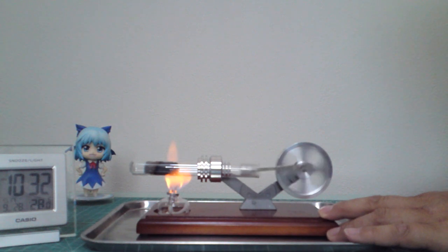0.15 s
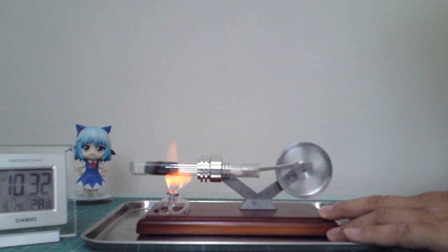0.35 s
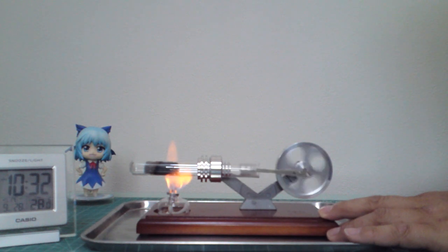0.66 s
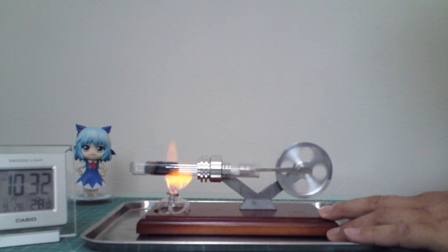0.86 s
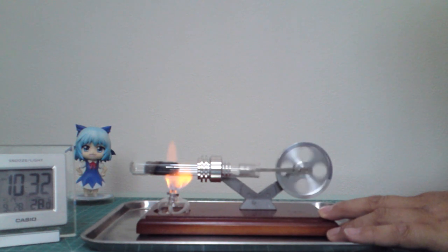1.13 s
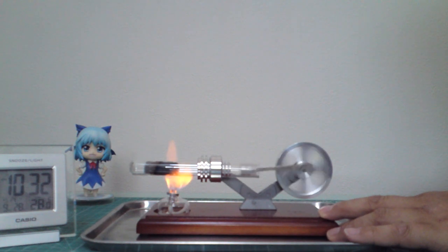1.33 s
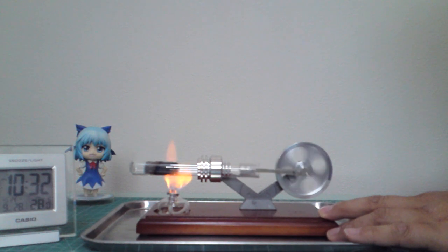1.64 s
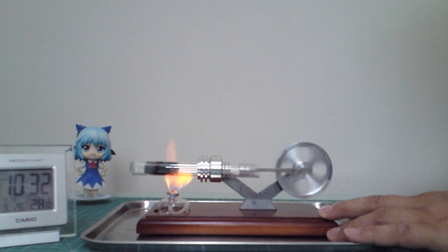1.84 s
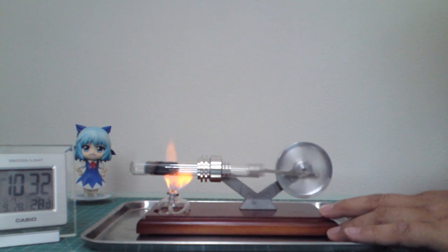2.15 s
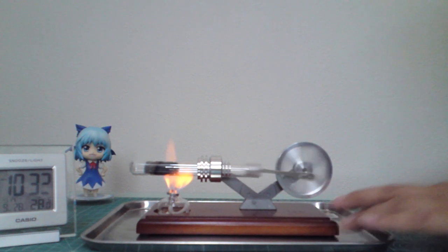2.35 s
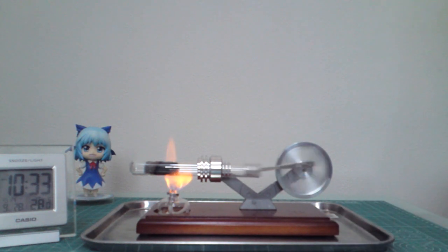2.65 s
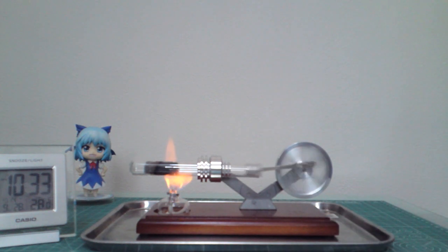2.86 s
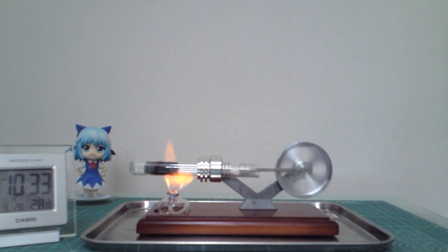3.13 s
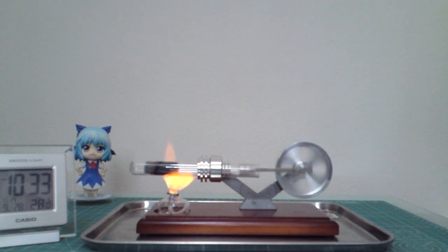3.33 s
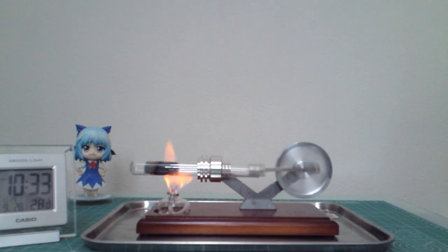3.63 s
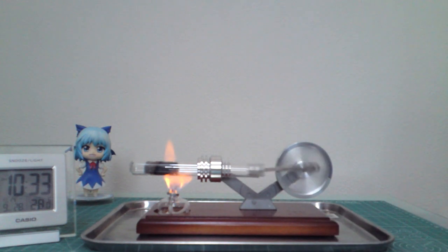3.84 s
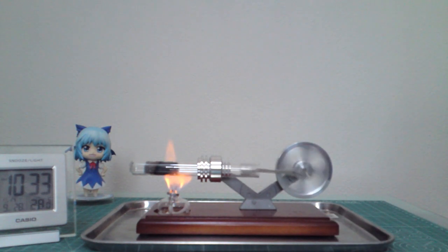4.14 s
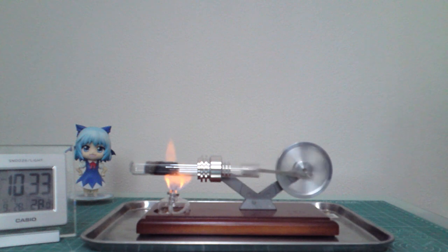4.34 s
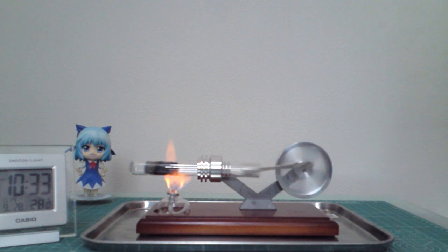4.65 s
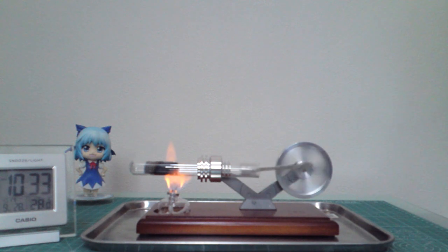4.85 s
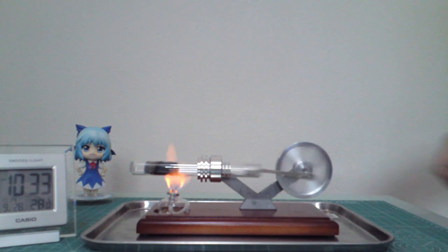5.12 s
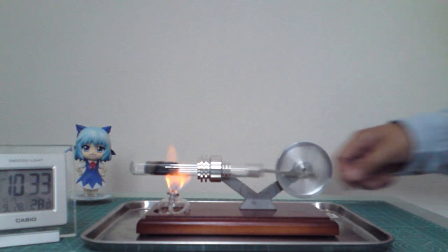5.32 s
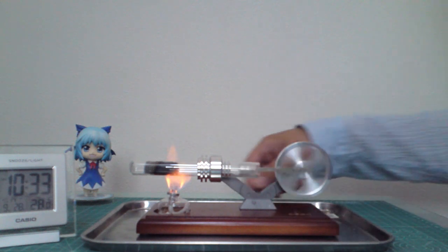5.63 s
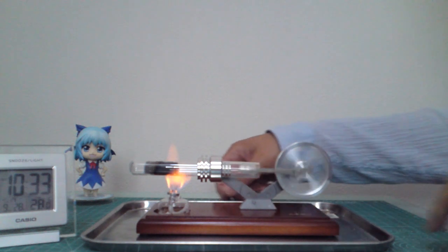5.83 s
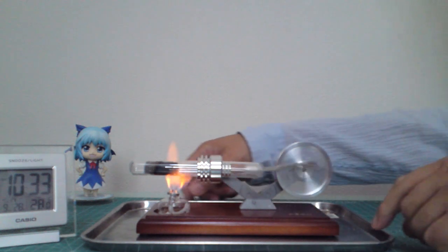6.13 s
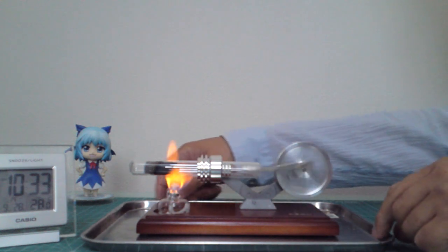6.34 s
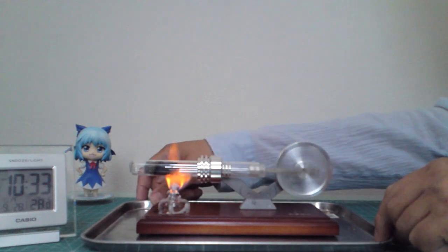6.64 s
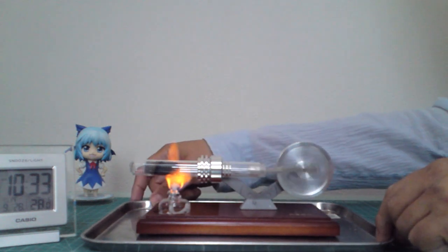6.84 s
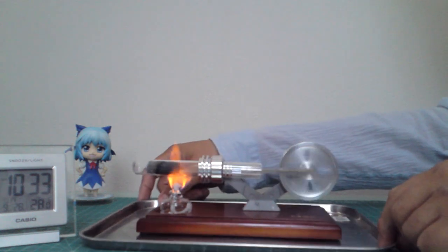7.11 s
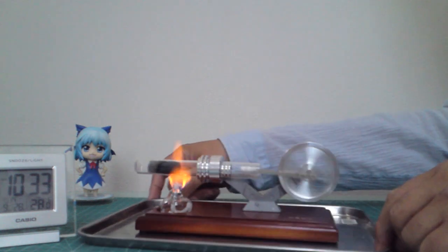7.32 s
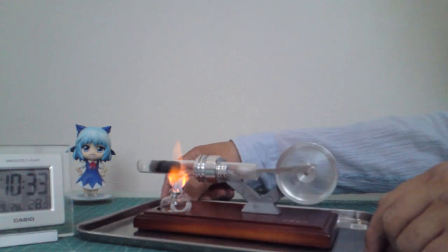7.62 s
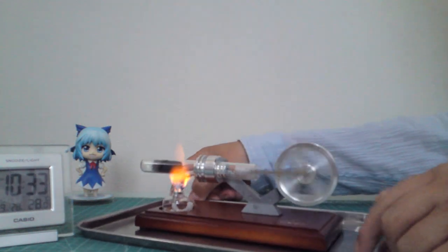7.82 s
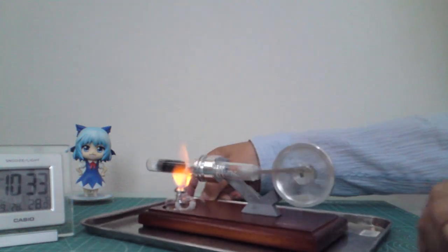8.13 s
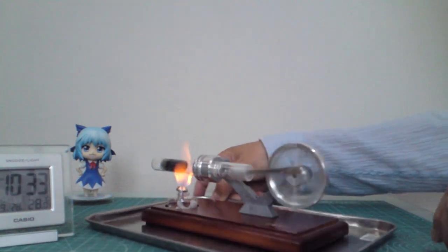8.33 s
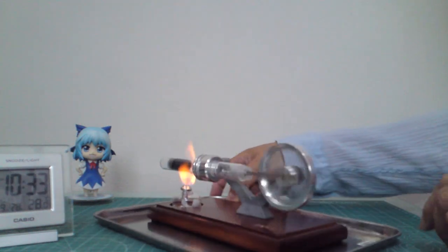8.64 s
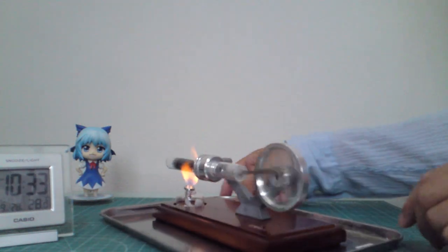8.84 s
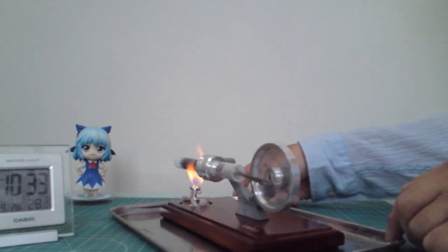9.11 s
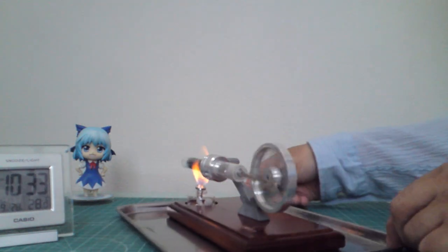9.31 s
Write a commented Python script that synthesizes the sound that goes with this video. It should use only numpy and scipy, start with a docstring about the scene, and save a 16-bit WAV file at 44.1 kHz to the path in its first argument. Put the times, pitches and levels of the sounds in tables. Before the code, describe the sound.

In a small bare room, a tabletop flame-heated engine knocks with dry metallic ticks, two per turn, a lighter then a heavier one. The ticks speed up quickly, then settle into a fast, gradually tightening clatter. Soft low thuds come from the wooden base on the desk, and short hollow pops crowd in past the middle as hands move close. A close microphone catches faint hiss and a thin whine.

```python
"""A small hot-air engine runs up on a wooden base in a steel tray, in a small bare room. Its loose crank joints
knock twice a turn: each knock is a tick of short, scraped resonances, a flutter of narrow-band repeats between
two walls, and a ring-out of rattled frame modes and room noise. The base thuds on the desk as low resonances,
and short low pops come as hands move near. One dull snap passes as a brief pressure dip; a faint wavering sine
whines over a low bed of coloured hiss."""
import sys
import numpy as np
from scipy import signal
from scipy.fft import rfft, irfft, next_fast_len
from scipy.io import wavfile

SR = 44100
rng = np.random.default_rng(int(sys.argv[2]) if len(sys.argv) > 2 else 0)


def file_out(sig):
    """Save sig as 16-bit WAV at sys.argv[1]."""
    # one column per channel
    cols = np.atleast_2d(sig).T
    # limit, then scale
    lim = np.clip(cols, -1, 1)
    pcm = np.round(lim * 32767).astype(np.int16)
    wavfile.write(sys.argv[1], SR, pcm)


N = 417627

# Crank knocks, two a turn, a light one and then a heavy one.
# Each row: time in seconds, tick level in dB, flutter level in dB (both before each mode's own level).
KNOCK_ROWS = [(0.057, -31.5, -41), (0.093, -28, -23.5), (0.402, -20, -22), (0.4379, -26, -19),
              (0.723, -27, -46), (0.764, -28, -21), (0.9885, -26.5, -35), (1.033, -27, -22),
              (1.237, -27, -34), (1.2812, -23.5, -34), (1.474, -19.5, -26.5), (1.5181, -25, -24),
              (1.703, -22.5, -27), (1.749, -21.5, -17.5), (1.9292, -20, -20.5), (1.9757, -23, -23),
              (2.1498, -20.5, -27), (2.1984, -25.5, -16.5), (2.369, -21, -25), (2.4165, -27, -14),
              (2.5816, -23, -27), (2.6301, -23, -12), (2.7912, -19.5, -25), (2.8401, -21.5, -10.5),
              (2.997, -22.5, -24), (3.046, -20.5, -14), (3.2005, -21.5, -19), (3.2478, -22, -15),
              (3.4007, -20.5, -26), (3.4498, -23, -16), (3.598, -20.5, -41), (3.6486, -19.5, -27),
              (3.7938, -20.5, -20), (3.8431, -18, -19), (3.9889, -19, -31), (4.0379, -18.5, -14.5),
              (4.1826, -22, -25), (4.2317, -22.5, -21.5), (4.375, -20.5, -22), (4.4233, -20, -16.5),
              (4.567, -21.5, -21.5), (4.616, -22, -22), (4.757, -19, -28), (4.808, -21.5, -18),
              (4.947, -21.5, -23), (4.9985, -20, -13), (5.1374, -20, -26), (5.1875, -23, -19.5),
              (5.3232, -22.5, -30), (5.377, -18, -19.5), (5.512, -18, -21.5), (5.5648, -18, -11.5),
              (5.699, -22.5, -22), (5.752, -18, -13), (5.8851, -21.5, -25), (5.9382, -21.5, -16.5),
              (6.0706, -21, -26), (6.1233, -15, -19.5), (6.256, -25, -20.5), (6.3093, -13.5, -19),
              (6.44, -24.5, -23.5), (6.4925, -19, -14.5), (6.624, -20.5, -18), (6.678, -19.5, -17),
              (6.8046, -24, -31), (6.8608, -13.5, -17.5), (6.988, -22.5, -17.5), (7.043, -21.5, -16.5),
              (7.171, -15.5, -18), (7.2258, -22, -14.5), (7.3509, -22, -20.5), (7.4068, -13, -24),
              (7.5331, -20.5, -19), (7.5878, -11.5, -11.5), (7.7135, -15, -25), (7.7685, -14, -16.5),
              (7.8915, -18, -20.5), (7.9458, -13, -17), (8.0697, -16, -22), (8.123, -11, -17),
              (8.2476, -15.5, -28), (8.3001, -20, -36), (8.4248, -21, -20.5), (8.4797, -13, -13),
              (8.601, -18, -22.5), (8.6566, -13, -14.5), (8.7767, -19.5, -33), (8.8327, -11, -14.5),
              (8.9526, -18, -31), (9.009, -15.5, -20), (9.128, -18, -32), (9.1857, -15.5, -24.5),
              (9.304, -18, -22), (9.359, -11.5, -17)]


def amp(db):
    """Turn decibels into gain."""
    return 10 ** (np.asarray(db) / 20)


def in_time(rows):
    """Draw each column of a timed table as a curve with one value per sample."""
    s, *columns = np.transpose(rows)
    return [np.interp(np.arange(N) / SR, s, c) for c in columns]


def colour(x, points):
    """Shape a steady signal by a spectrum of (Hz, dB) points."""
    size = next_fast_len(N)
    hz = np.maximum(np.fft.rfftfreq(size, 1 / SR), 1)
    point_hz, point_db = np.transpose(points)
    gain = amp(np.interp(np.log(hz), np.log(point_hz), point_db))
    return irfft(rfft(x, size) * gain, size)[:N]


def clicks(s, db):
    """Put a one-sample click at each event, over a floor too small to hear."""
    out = np.full(N, 1e-18)
    places = np.clip((np.asarray(s) * SR).astype(int), 0, N - 1)
    np.add.at(out, places, amp(db))
    return out


def ring(x, hz, width_hz):
    """A resonance: a unit click starts a dying sine of height 1, shorter when the width is larger."""
    r, w = np.exp(-np.pi * width_hz / SR), 2 * np.pi * hz / SR
    return signal.lfilter([0, np.sin(w)], [1, -2 * r * np.cos(w), r * r], x)


def ring_softly(x, hz, width_hz):
    """A resonance met twice: it swells to height 1 after a unit click and has steep flanks."""
    twice = ring(ring(x, hz, width_hz), hz, width_hz)
    return twice * 2 * np.e * np.pi * width_hz / SR


def fade(x, t60):
    """Each click jumps to its height and dies away, by 60 dB in t60 seconds."""
    return signal.lfilter([1], [1, -amp(-60 / (t60 * SR))], x)


def swell(x, rise_s):
    """Smooth a signal, which rounds the start of an envelope."""
    r = np.exp(-1 / (rise_s * SR))
    return signal.lfilter([1 - r], [1, -r], x)


def later(x, lag_s):
    """Delay a signal."""
    return np.concatenate([np.zeros(round(lag_s * SR)), x])[:N]


def rattle(per_s, spread_db):
    """Uneven micro-clicks at random moments, scaled to an rms of 1."""
    sizes = amp(spread_db * np.minimum(rng.exponential(1, N), 4)) * rng.choice([-1, 1], N)
    grains = sizes * (rng.random(N) < per_s / SR)
    return grains / grains.std()


def strike(s, db, modes, spread_db, scrape_db, stagger_s):
    """The joint scrapes, then closes in a few small impacts; each mode is met a little apart."""
    out = np.zeros(N)
    chance = np.clip(rng.normal(0, 1, (len(s), len(modes), 4)), -2, 1.5)
    for k, (hz, width_hz, mode_db) in enumerate(modes):
        level = db[:, k] + mode_db + spread_db * chance[:, k, 0]     # db has a column per mode
        blow = clicks(s + stagger_s * chance[:, k, 1], level)
        before = clicks(s - .0015 + stagger_s * chance[:, k, 2], level - 5.5)
        after = clicks(s + 0.002 + stagger_s * chance[:, k, 3], level - 13.0)
        grit = fade(blow[::-1], 0.015)[::-1] + fade(blow, 0.0075)     # grows into the blow and dies after it
        scrape = amp(scrape_db) * grit * rng.standard_normal(N)
        out += ring_softly(blow + before - after + scrape, hz, width_hz)
    return out


def run_up():
    """As the engine gathers force, set the ring-out and tick-top level of every knock."""
    # Each row: time in seconds, ring-out level of the light and of the heavy knock in dB,
    # level of the top of the tick for the light and for the heavy knock in dB (all relative).
    force_rows = [(0, -44, -46.5, -46, -39), (1.5, -42.5, -41, -34, -37), (2.5, -41, -38, -33.5, -30.5),
                  (3.5, -40.5, -39, -34.5, -24.5), (4.3, -43.5, -38.5, -36.5, -30),
                  (5.5, -41, -37, -34, -22), (7.2, -40, -36, -36.5, -22.5), (8.4, -41.5, -34, -30, -21.5),
                  (9.47, -40, -33.5, -38, -23)]
    s, (at, *columns) = np.array(KNOCK_ROWS)[:, 0], np.transpose(force_rows)
    ring_light, ring_heavy, top_light, top_heavy = (np.interp(s, at, c) for c in columns)
    heavy = np.arange(len(s)) % 2 == 1
    return np.where(heavy, ring_heavy, ring_light), np.where(heavy, top_heavy, top_light)


def hiss():
    """Low rumble and hiss: random noise shaped by a spectrum, with a slowly changing level."""
    # Each row: frequency in Hz, relative level in dB per Hz.
    spectrum = [(20, 7.5), (35, -9), (70, -2.5), (140, -8.5), (300, -11.5), (500, -13), (900, -16),
                (1500, -21), (3000, -23), (6000, -27), (9000, -22)]
    # Each row: time in seconds, level in dB rms.
    loudness = [(0, -50.5), (3, -49.5), (6, -47.5), (9.47, -46.5)]
    noise = colour(rng.standard_normal(N), [(3.1, -33.5)] + spectrum)
    return amp(in_time(loudness)[0]) * noise / noise.std()


def whine():
    """A thin sine tone whose pitch and strength waver."""
    # Each row: time in seconds, middle pitch in Hz, middle level in dB rms.
    tone_rows = [(0, 1205, -64), (1.3, 1203, -64.5), (2.7, 1195, -69), (3.0, 1183, -66), (3.3, 1190, -65),
                 (3.7, 1178, -64), (4.2, 1198, -64), (4.3, 1165, -69), (4.9, 1178, -67), (5.1, 1157, -66),
                 (6.05, 1154, -64), (6.3, 1170, -74), (9.47, 1170, -82)]
    hz, db = in_time(tone_rows)
    waver = swell(swell(rng.standard_normal(N), 0.025), 0.025)
    waver = waver / waver.std()
    wavering_hz = hz + 3.98 * waver[::-1]     # reversed, so pitch and strength do not move together
    tone = np.sin(2 * np.pi * np.cumsum(wavering_hz) / SR)
    return np.sqrt(2) * amp(db + 2.4 * waver) * tone


def snap():
    """A lone dull snap: a sudden dip in pressure that recovers within a few milliseconds."""
    dip = fade(clicks([1.3351], -27), 0.0061)     # start in s, level in dB; t60 in s
    return -swell(dip, .0001)


def pops():
    """Each pop is a soft push on a hollow, well-damped body with a woody overtone; deeper pops ring longer."""
    # Each row: start in seconds, level in dB, pitch in Hz.
    pop_rows = [(2.564, -30, 337), (2.596, -37.5, 377), (4.721, -42, 350), (4.787, -32.5, 342),
                (5.094, -30, 280), (5.125, -36, 378), (5.299, -29, 320), (5.315, -39, 237),
                (5.42, -41, 294), (5.437, -37, 345), (5.667, -33.5, 345), (5.773, -32, 342),
                (5.804, -32.5, 345), (5.836, -29.5, 346), (5.915, -28.5, 342), (5.926, -36, 310),
                (5.958, -30.5, 350), (6.015, -29, 350), (6.027, -35, 326), (6.056, -33.5, 342),
                (6.073, -33.5, 382), (6.1, -35, 340), (6.126, -29.5, 358), (6.196, -29.5, 342),
                (6.239, -31.5, 360), (6.285, -31.5, 360), (6.314, -30.5, 337), (6.3995, -29.5, 367),
                (6.429, -29.5, 366), (6.456, -31.5, 357), (6.523, -29, 350), (6.559, -34.5, 350),
                (6.603, -29, 366), (6.628, -33.5, 324.4), (7.415, -31.5, 188), (8.519, -36.5, 339),
                (8.736, -42, 347), (8.812, -33.5, 348), (9.236, -31.5, 352), (9.449, -32, 350)]
    out, push = np.zeros(N + SR), np.zeros(SR // 10)
    push[0] = 1
    for s, db, hz in pop_rows:
        body = ring_softly(push, hz, hz * hz / 600)
        body += amp(-11.0) * ring_softly(push, 1.75 * hz, 0.47 * hz)     # the overtone
        body += amp(-16) * ring(push, hz, 40)     # a faint after-ring
        # a small body radiates little below its note
        body = signal.sosfilt(signal.butter(2, .7 * hz, "high", fs=SR, output="sos"), body)
        start = int(s * SR)
        out[start:start + len(push)] += amp(db) * body
    return out[:N]


def thuds():
    """The second knock of each turn rocks the base, which lands softly a moment later and rocks unevenly."""
    # Base on desk. Each row: time in seconds, level of the main landing in dB before the resonances.
    landing_level = [(0, -42.5), (1.5, -40), (3, -42.5), (5, -40.5), (6.5, -44.5), (7.2, -51), (9.47, -71)]
    s = np.array(KNOCK_ROWS)[1::2, 0]
    chance = rng.normal(0, 1, (len(s), 4))
    db = np.interp(s, *np.transpose(landing_level)) + 0.5 * chance[:, 0]
    landing = clicks(s + 0.01595, db)
    landing += clicks(s + 0.0443 + .004 * chance[:, 1], db - 10.5 + 2.0 * chance[:, 2])
    landing += clicks(s - .04 + .004 * chance[:, 3], db - 6.0)     # a touch ahead of the knock
    base = ring_softly(landing, 105.2, 35) + amp(-5.5) * ring_softly(landing, 76.0, 31)
    return signal.sosfilt(signal.butter(2, 60, "high", fs=SR, output="sos"), base)


def ring_out():
    """Loose parts rattle on and dense reflections follow: the frame's modes keep sounding, then die away."""
    # Frame, flywheel and tray. Each row: pitch in Hz, width in Hz, relative level in dB seen from the side,
    # relative level in dB with the tray turned, t60 in seconds (widths and t60 are limited below).
    frame_modes = [(878, 295, -9.5, -11.5, 0.11), (1104, 138, -15, -6, 0.14), (514, 77, -11.5, -11.5, 0.24),
                   (1534, 440, -16.5, -9, 0.14), (1922, 156, -10, -11, 0.14), (1997, 134, -4, -8, 0.072),
                   (2330, 350, -17, -17.5, 0.51), (2413, 170, -9, -9, 0.17), (2677, 49, -11.5, 1.5, 0.21),
                   (2801, 55, -1, 6, 0.089), (2761, 41, -9, -1.5, 0.14), (3105, 120, -6.5, -2.5, 0.23),
                   (3186, 100, -3.5, -3, 0.1), (3710, 67, -19, -21, 0.057), (3850, 160, -13, -10, .18),
                   (3963, 51, 3.5, -8, 0.16), (4142, 105, 0, -0.5, 0.15), (4032, 22, -14, -3.5, 0.2),
                   (4265, 130, -11, -7, 0.1), (4480, 68, -15.5, -7.5, 0.095), (4836, 68, -4.5, -10.5, 0.25),
                   (5030, 96, -12, -8.5, 0.25), (5216, 130, -10, -13.5, 0.22),
                   (5590, 180, -10, -12.5, 0.27), (5970, 110, -15, -5, 0.18), (6370, 280, -13.5, -12, 0.17),
                   (6880, 170, -18, -22.5, 0.11), (7760, 260, -12.5, -15, 0.3),
                   (8500, 240, -25, -18.5, 0.16), (8971, 223, 4, 7, 0.25)]
    # Each row: time in seconds, share of the tray's turn from 0 to 1.
    tray_turn = [(0, 0.28), (5.4, 0.36), (7.0, 0.72), (9.47, 0.9)]
    longest_t60_s = .195     # no mode's envelope fades more slowly
    narrowest_hz = 85     # every mode is damped by the wooden base
    even_tick_db, brighter_per_db = -21.5, 0.69     # a harder tick lifts the upper modes over the lower
    (s, tick_db, _), ring_db = np.transpose(KNOCK_ROWS), run_up()[0]
    bright_db = brighter_per_db * (tick_db - even_tick_db)
    turned = np.clip(np.interp(s, *np.transpose(tray_turn)), 0, 1)
    out = np.zeros(N)
    chance = np.clip(rng.normal(0, 1, (len(s), len(frame_modes))), -2, 2)
    drive = [rattle(900, 2.86) + 0.62 * rng.standard_normal(N) for _ in range(2)]
    for k, (hz, width_hz, side_db, turned_db, t60) in enumerate(frame_modes):
        width_hz = max(width_hz, narrowest_hz)
        tilt_db = bright_db * (.5 if hz > 3500 else -.5)     # shared out between the upper and lower modes
        mode_db = side_db + turned * (turned_db - side_db)
        blows = clicks(s - .0012, ring_db + tilt_db + mode_db + 3.34 * chance[:, k])
        envelope = swell(fade(blows, min(t60, longest_t60_s)), 0.0036)
        even_gain = (2 * np.pi * width_hz / SR) / np.e      # unit gain at the mode's centre
        out += ring_softly(envelope * drive[k % 2], hz, width_hz) * even_gain
    # the room's slow tail has no pitch of its own
    room = fade(clicks(s, ring_db - 22.0), 0.63) * rng.standard_normal(N)
    room_band = signal.butter(2, [1500, 7000], "band", fs=SR, output="sos")
    return amp(19) * out + signal.sosfilt(room_band, room)


def flutter():
    """A narrow band of each knock comes back every wall-to-wall round trip."""
    # What the walls return. Each row: pitch in Hz, width in Hz, relative level in dB.
    wall_band = [(2880, 330, -11.5), (3053, 212, -8)]
    # One column: gain in dB of the direct sound, then of each round.
    rounds_db = [-13, -3, -21, -19, -24.5]
    lead_s, round_trip_s = 0.001197, .0124     # lead: the strike comes this much ahead of the knock's time
    s, flutter_db = np.transpose(KNOCK_ROWS)[[0, 2], :, None]
    levels = np.tile(flutter_db, len(wall_band))
    band = strike(s[:, 0] - lead_s, levels, wall_band, spread_db=-0.5, scrape_db=-23.5, stagger_s=.0006)
    return sum(amp(db) * later(band, round_trip_s * k) for k, db in enumerate(rounds_db))


def ticks():
    """The direct tick, with single wall echoes; each blow favours the modes near its own pitch."""
    # What the joint ticks with, then the top of the tick.
    # Each row, in both tables: pitch in Hz, width in Hz, relative level in dB.
    pin_modes = [(889, 145, -21), (1210, 310, -23), (1526, 300, -19.5), (2035, 960, -10.5),
                 (4010, 380, -13.5), (4510, 450, -13.5), (4995, 670, -11.5), (5163, 320, -14),
                 (5800, 1200, -11.5), (6280, 1300, -24)]
    top_modes = [(8130, 1500, -6.5), (9500, 270, 13.5)]
    # Single walls. Each row: lag in seconds, gain in dB.
    wall_echoes = [(0.0167, -11.5), (0.0208, -13), (.0285, -11.5)]
    lead_s = 0.00048     # the strike comes this much ahead of the knock's time
    low_hz, high_hz, high_share = 4000, 5150, .65     # a tick lands near one of two pitches, by chance
    s, tick_db = np.transpose(KNOCK_ROWS)[:2, :, None]
    pitch_hz = np.where(rng.random(s.shape) < high_share, high_hz, low_hz)
    pitch_hz = pitch_hz * (1 + 0.051 * rng.standard_normal(s.shape))
    octaves_off = np.minimum(np.abs(np.log2(np.array(pin_modes)[:, 0] / pitch_hz)), .3)
    contact_s = s[:, 0] - lead_s
    body = strike(contact_s, tick_db - 30 * octaves_off, pin_modes,
                  spread_db=1.0, scrape_db=-21.5, stagger_s=.00025)
    top_db = np.tile(run_up()[1][:, None], len(top_modes))
    top = strike(contact_s, top_db, top_modes, spread_db=1.5, scrape_db=-18.0, stagger_s=0.00032)
    direct = body + top
    return direct + sum(amp(db) * later(direct, lag) for lag, db in wall_echoes)


def scene():
    """Add up all sources; they reach left and right almost alike."""
    # Left-right difference under the sum. Each row: frequency in Hz, relative level in dB.
    side_spectrum = [(60, -36), (125, -39), (250, -30), (500, -28), (1000, -25.5), (1500, -16.5),
                     (2700, -27.5), (5000, -27), (9000, -22)]
    mid = ticks() + flutter() + ring_out() + thuds() + pops() + snap() + whine() + hiss()
    # the small left-right difference never holds still
    flicker = swell(swell(rng.standard_normal(N), 0.0097), 0.0097)
    side = colour(mid * flicker / flicker.std(), side_spectrum)
    return np.array([mid + side, mid - side])


def record(dry):
    """Cut the top steeply: a gentler low-pass, then one that is 55 dB down from 9250 Hz."""
    gentler = signal.sosfilt(signal.butter(6, 9600, fs=SR, output="sos"), dry)
    return signal.sosfilt(signal.cheby2(16, 55, 9250, fs=SR, output="sos"), gentler)


dry = scene()
out = record(dry)
file_out(out)
```